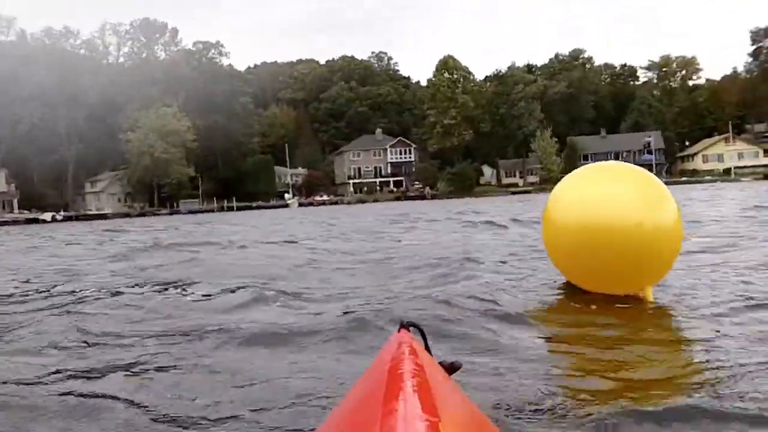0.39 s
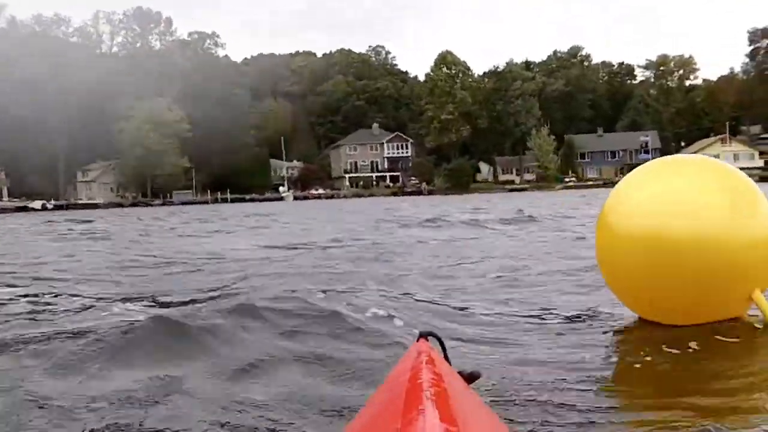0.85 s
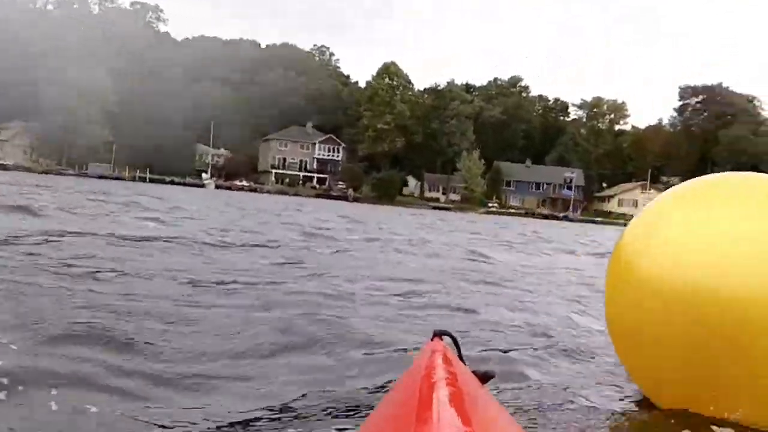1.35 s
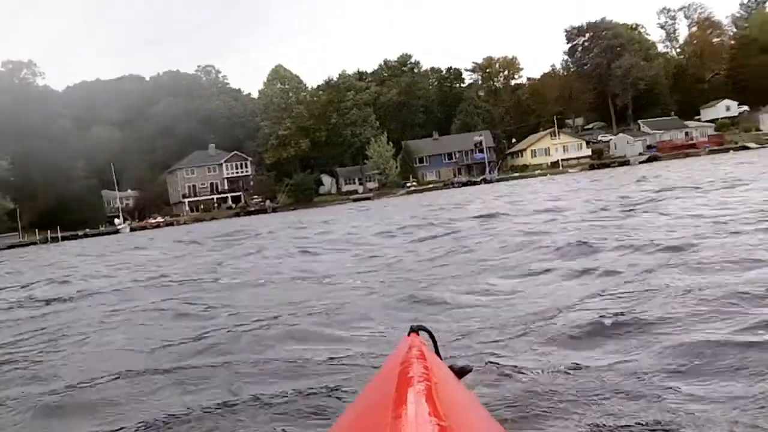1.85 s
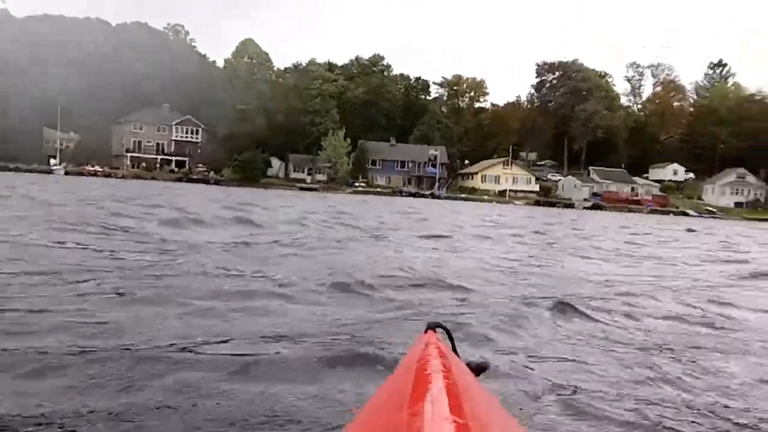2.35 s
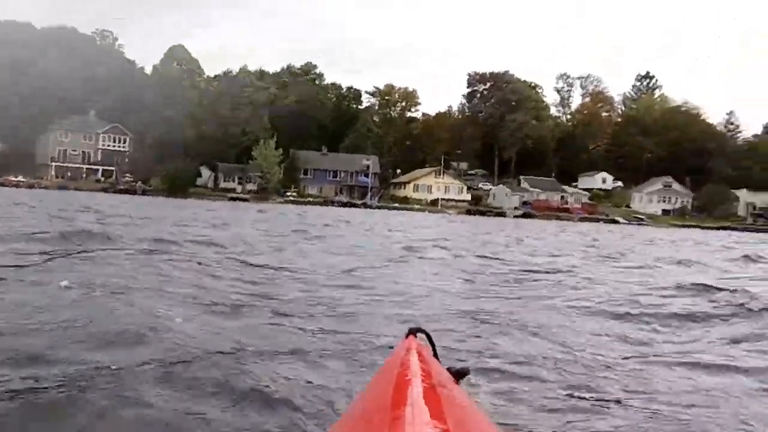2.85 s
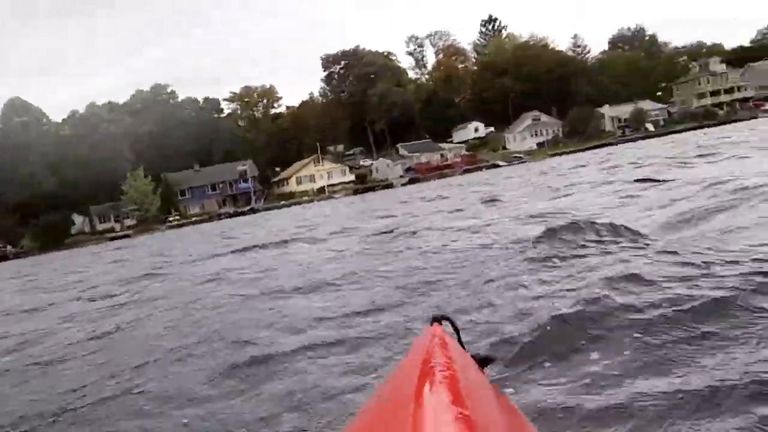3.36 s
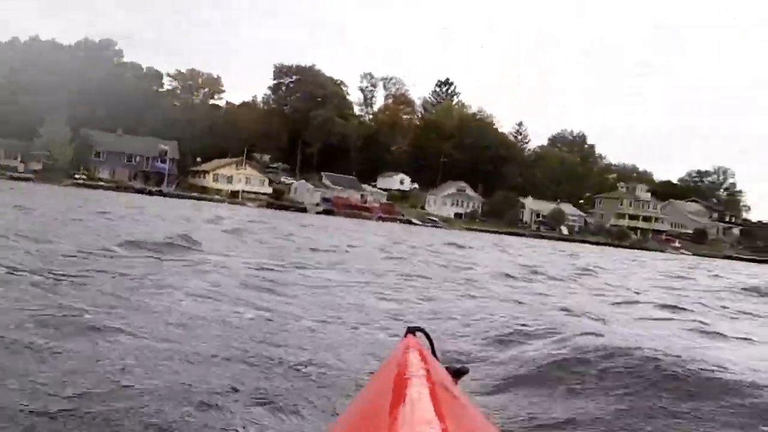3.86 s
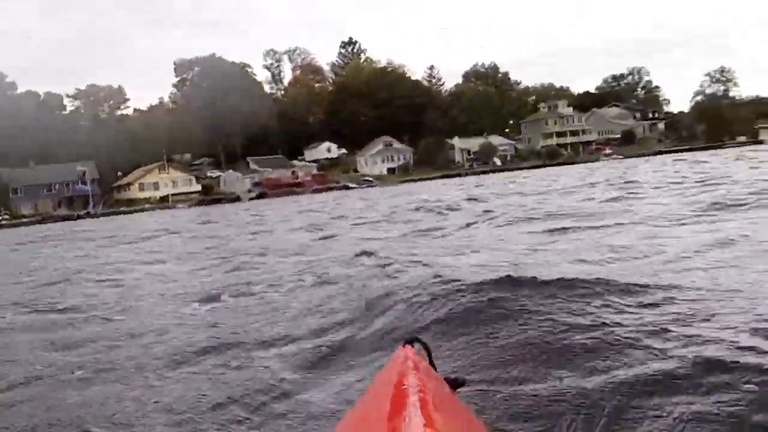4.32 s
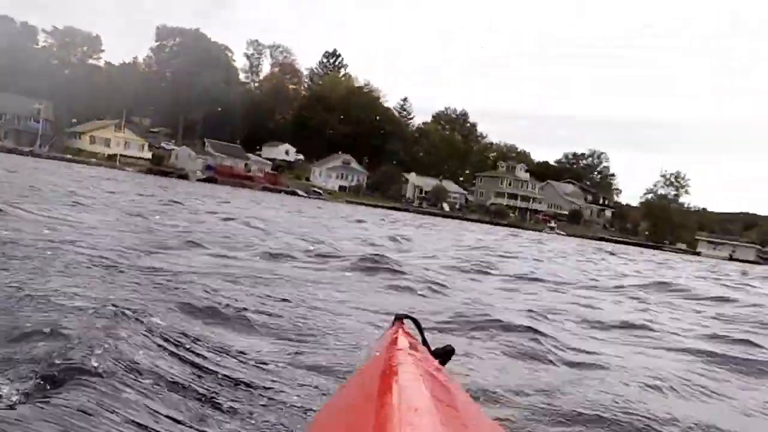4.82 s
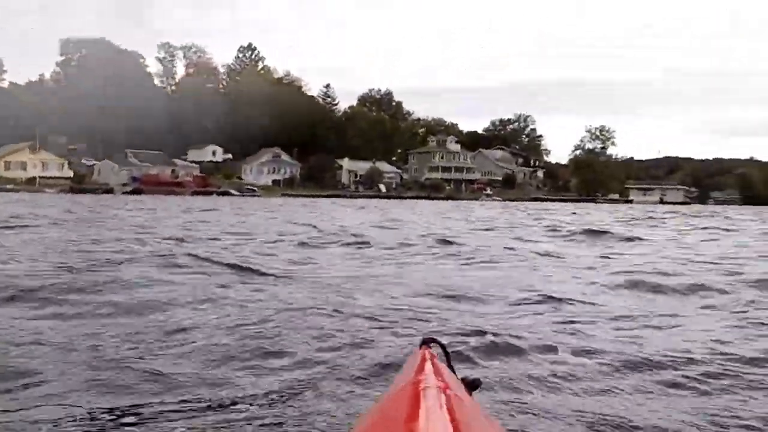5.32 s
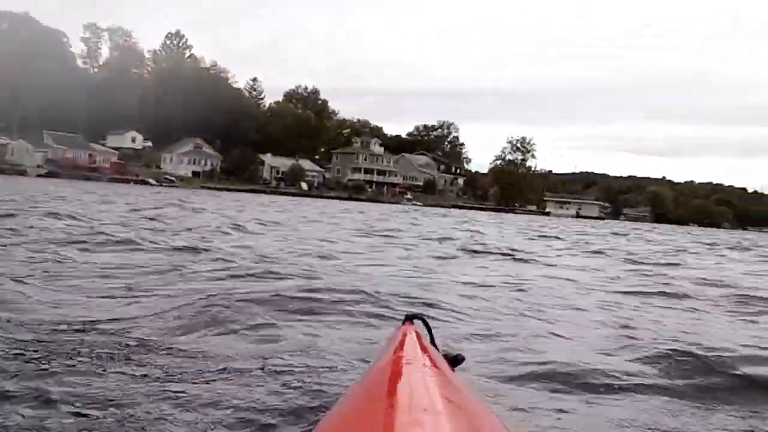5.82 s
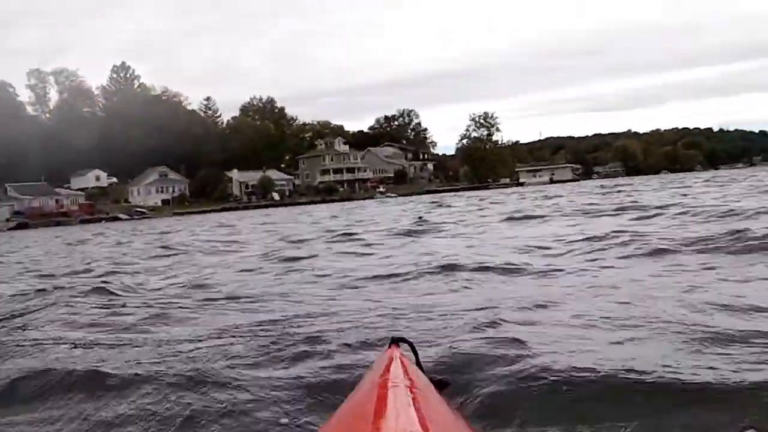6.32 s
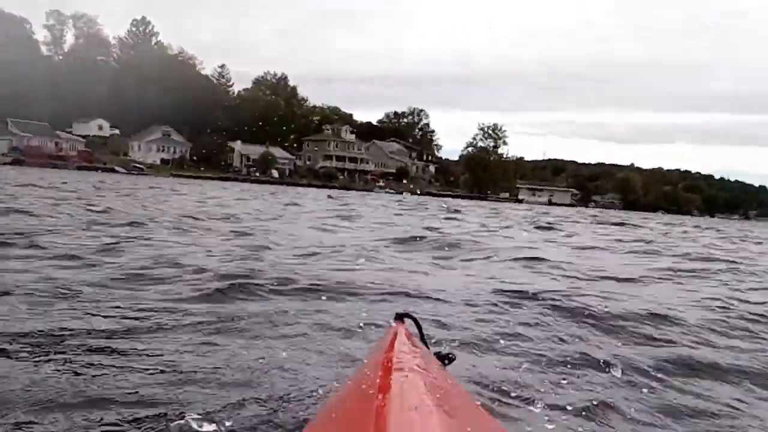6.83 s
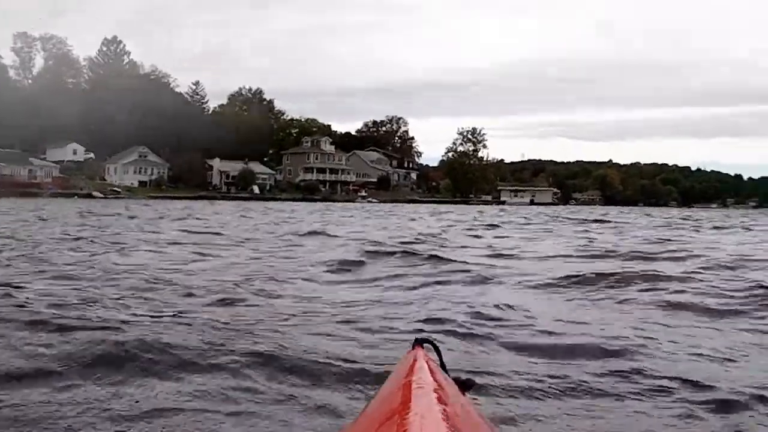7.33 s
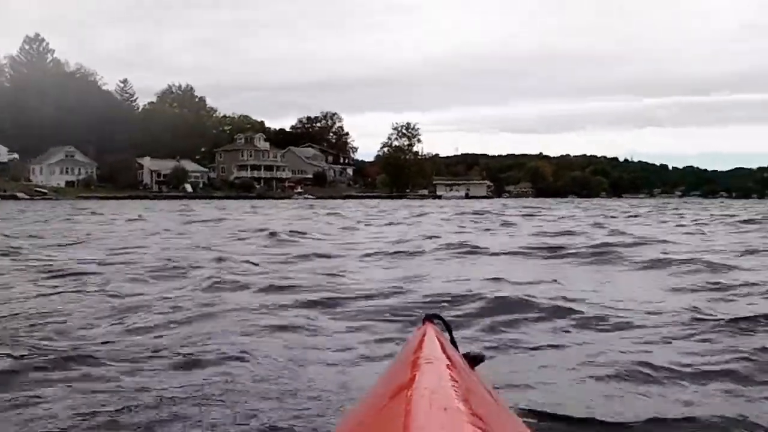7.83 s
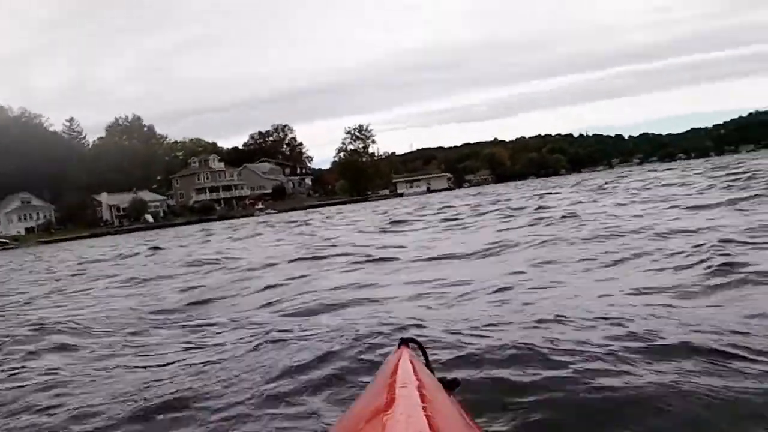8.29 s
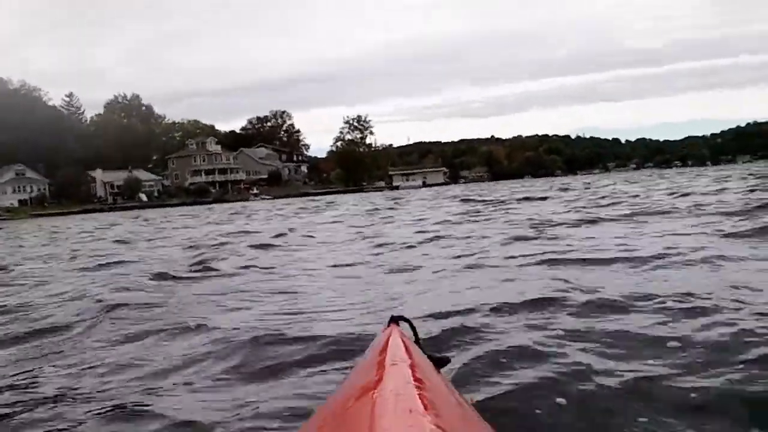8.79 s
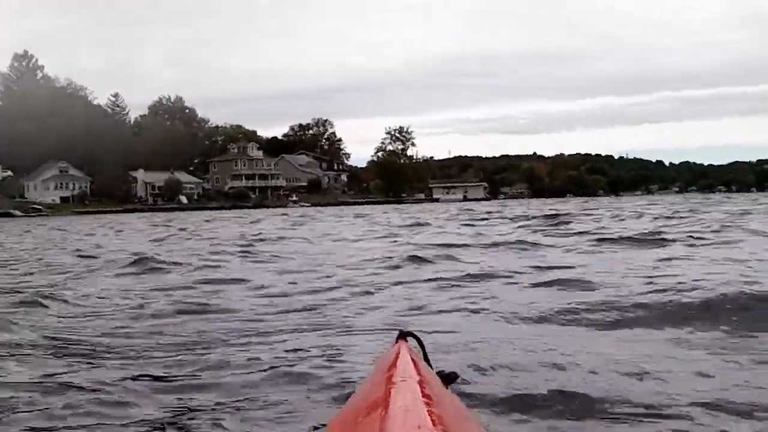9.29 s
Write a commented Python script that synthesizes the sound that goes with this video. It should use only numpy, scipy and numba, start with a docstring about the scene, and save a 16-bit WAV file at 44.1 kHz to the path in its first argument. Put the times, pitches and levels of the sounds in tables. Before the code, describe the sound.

From a kayak on a choppy lake, close and muffled inside a waterproof case: gusty low wind rushes and buffets, water gurgles along the hull, and wavelets knock the hollow plastic bow. A sharp knock comes near 2.5 seconds, the heaviest slap and thud at 4.3, another thud at 6.3. Spray and bubbles patter between; wind fades late, leaving faint hiss.

```python
"""Waves swash, thud and knock on the plastic bow of a kayak in choppy lake water: damped rings and shaped noise.
Spray and drops patter as swarms of short rings, bubbles ring singly, and sheets of water hiss along the bow.
Wind buffets and rushes over the waterproof case of a small camera: noise under wandering levels, and puffs.
The case dulls the treble, so the camera's own steady hiss fills it and ducks under the hardest slaps."""
import sys
import numpy as np
from scipy import signal
from scipy.fft import rfft, irfft, next_fast_len
from scipy.io import wavfile
from scipy.ndimage import uniform_filter1d
from numba import njit

SR = 44100
rng = np.random.default_rng(int(sys.argv[2]) if len(sys.argv) > 2 else 0)


def undo_db(level):
    """Turn decibels back into plain size, where 20 dB means ten times bigger."""
    steps = np.asarray(level, float) / 20
    return 10 ** steps


def unload_wav(signal):
    """Save mono or channel-first audio to the path in sys.argv[1] as 16-bit WAV at rate SR, clipped to [-1, 1]."""
    wavfile.write(
        sys.argv[1],
        SR,
        np.round(np.clip(np.atleast_2d(signal).T, -1, 1) * 32767).astype(np.int16),
    )


N = 426447

# course of the wind: (time [s], rush level [dB], buffeting level [dB], level of the rush's bright edge [dB])
WIND_COURSE = [(0.0, -38.5, -48, -60), (0.4, -37.5, -45, -56), (0.84, -42.5, -50, -58.5),
               (0.96, -42, -35, -64), (1.14, -39.5, -50, -55), (1.45, -39.5, -46.5, -56),
               (1.83, -37.5, -38, -53), (2.26, -34, -45.5, -50), (2.48, -42, -36, -58.5),
               (2.63, -34, -38.5, -49.5), (2.73, -43, -36.5, -60.5), (3.0, -33, -39.5, -40.5),
               (3.5, -39, -37, -52), (3.77, -32, -29, -48), (3.95, -37.5, -39.5, -44),
               (4.42, -37.5, -40, -51), (4.98, -41.5, -43, -58.5), (5.27, -38.5, -41, -49),
               (6.05, -41.5, -43, -59.5), (6.27, -37, -47, -53.5), (7.06, -48, -47, -59),
               (7.78, -41.5, -41.5, -56), (8.1, -46, -45.5, -58.5), (8.2, -54, -51, -66),
               (9.05, -56, -54, -66.5), (9.67, -49, -45, -54.5)]
# the rush rises in pitch as the boat turns in the wind: (time [s], centre frequency [Hz])
RUSH_PITCH = [(0, 426), (2.3, 513), (4.2, 537), (9.67, 636)]
# passage of spray sound through the cavity of the case: (frequency [Hz], relative gain [dB])
CAVITY_RESPONSE = [(900, -36), (1500, -2.5), (1900, -3), (2400, 2), (3000, 4), (3600, -2), (4300, -4),
                   (5500, -16), (8000, -22)]
GUST_DB = -40  # rush level at which swash and spray have their reference levels


def level(x, db):
    """Root-mean-square scaling: brings a signal to an rms level in dB."""
    return x * undo_db(db) / np.sqrt(np.mean(x ** 2))


def colour(x, points):
    """Linear filtering: multiplies the spectrum by (Hz, dB) points joined on a log-frequency axis."""
    hz, db = np.transpose(points)
    size = next_fast_len(N)
    f = np.arange(size // 2 + 1) * SR / size + 1
    gain = undo_db(np.interp(np.log(f), np.log(hz), db))
    return irfft(rfft(x, size) * gain, size)[:N]


def curves(table):
    """Linear interpolation: the columns of a timed table, one value a sample."""
    s, *columns = np.transpose(table)
    return [np.interp(np.arange(N) / SR, s, column) for column in columns]


def walk(rate):
    """Smoothed random process: levels held 1 / rate s and averaged twice, with a spread near 1."""
    k = int(SR / rate)
    held = np.repeat(rng.standard_normal(N // k + 1), k)
    return 1.37 * uniform_filter1d(uniform_filter1d(held, k), k)[:N]


def flicker(x, rate, depth_db):
    """Amplitude modulation: a random walk of the level in dB, then scaling to unit rms."""
    return level(x * undo_db(depth_db * walk(rate)), 0)


def swells(table):
    """Exponential growth and decay: gain of events that rise, hold and die away, summed in power."""
    fall_s = 0.086
    t = np.arange(0, N, 64) / SR
    s, rise_s, hold_s, db = np.transpose(table)[:, :, None]
    rising = (t - s) / rise_s
    falling = (s + hold_s - t) / fall_s
    shape = np.exp(np.minimum(0, np.minimum(rising, falling)))
    gain = np.sqrt(np.sum((undo_db(db) * shape) ** 2, axis=0))
    return np.interp(np.arange(N) / SR, t, gain)


@njit
def svf(x, hz, width):
    """Resonance: a state-variable band-pass with a moving centre, width in Hz."""
    y, band, low = np.empty(len(x)), 0., 0.
    for i in range(len(x)):
        g, k = np.tan(np.pi * hz[i] / SR), width / hz[i]
        v = (band + g * (x[i] - low)) / (1 + g * (g + k))
        band, low, y[i] = 2 * v - band, low + 2 * g * v, k * v
    return y


@njit
def ring(s, size, hz, cycles, glide, sharp, length):
    """Damped oscillation: swells (faster when sharp), peaks at s, dies within its cycles as the pitch glides."""
    out = np.zeros(length)
    rise = np.log(sharp + 1) / sharp
    top = (sharp / (sharp + 1)) ** 2 * np.exp(-2 * rise)
    for j in range(len(s)):
        tau, phase = cycles[j] / hz[j] * SR, 0.
        start = max(int(s[j] * SR - rise * tau), 0)
        for i in range(min(int(5 * tau), length - start)):
            u = i / tau
            phase += 2 * np.pi * hz[j] * (1 + glide * u) / SR
            envelope = (1 - np.exp(-sharp * u)) ** 2 * np.exp(-2 * u)
            out[start + i] += size[j] / top * envelope * np.sin(phase)
    return out


def burst(s, db, hz, cycles, glide, sharp, after_s, spread, rest_db, count, lead=.35):
    """Superposed modes: each main ring is broken up by weaker ones at scattered times and pitches around it."""
    u = rng.random((len(s), 3, count))
    times = s[:, None] + after_s * (u[:, 0] - lead)
    pitch = hz[:, None] * np.exp(spread * (2 * u[:, 1] - 1))
    size = undo_db(db[:, None] + rest_db * (0.5 + u[:, 2]))
    rest_cycles = 0.607 * np.repeat(cycles, count)
    rest = ring(times.ravel(), size.ravel(), pitch.ravel(), rest_cycles, glide, sharp, N)
    return ring(s, undo_db(db), hz, cycles, glide, sharp, N) + rest


def patter(lo_hz, hi_hz, cycles, scatter_db, glide, sharp, count):
    """Random impulses: rings spread evenly over time and log pitch, most small and a few larger."""
    u = rng.random((count, 4)).T
    size = undo_db(-scatter_db * np.log(1 - .98 * u[1]))
    hz = lo_hz * (hi_hz / lo_hz) ** u[2]
    return ring(u[0] * N / SR, size, hz, cycles * 4 ** (u[3] - .5), glide, sharp, N)


@njit
def follow(x, attack, release):
    """Peak detection: an envelope that closes a fraction of the gap each sample, upward by attack."""
    e, y = 0., np.empty(len(x))
    for i in range(len(x)):
        e += (abs(x[i]) - e) * (attack if abs(x[i]) > e else release)
        y[i] = e
    return y


def hiss():
    """Electronic noise: the camera's steady hiss, random and broad in spectrum."""
    # (frequency [Hz], relative gain [dB])
    hiss_spectrum = [(500, 0), (4000, 0), (9000, -4), (11500, -2), (15000, -3)]
    return level(colour(rng.standard_normal(N), hiss_spectrum), -62)


def wind():
    """Turbulence: eddies shove the case, and air rushes past the port in a broad band that moves with the gust."""
    # low-frequency buffeting: (frequency [Hz], relative gain [dB])
    buffet_spectrum = [(12, -1), (25, -1), (40, 3.5), (57, 11.5), (80, 1), (130, -3.5), (200, -70)]
    # bright edge of the rush: (frequency [Hz], relative gain [dB])
    edge_spectrum = [(600, -16), (850, 3.5), (1100, 2), (1400, -4.5), (1700, -15.5), (2200, -54)]
    rush_db, buffet_db, edge_db = curves(WIND_COURSE)
    hz = curves(RUSH_PITCH)[0] * (1 + 0.052 * walk(4.02))
    eddies = walk(14)

    rumble = colour(rng.standard_normal(N), buffet_spectrum)
    buffet = flicker(rumble * undo_db(0.85 * eddies), 7.3, 0.7)
    # single eddies dent the pressure for about a cycle or less
    shoves = level(patter(20.7, 140.0, 0.51, 2.9, glide=0.089, sharp=5.7, count=160), -0.92)

    band = svf(svf(rng.standard_normal(N), hz, 330.0), hz, 333.0)
    dull = signal.sosfilt(signal.butter(4, 760, fs=SR, output="sos"), band)
    rush = flicker(dull * undo_db(1.22 * eddies), 40, 2.8)

    bright = colour(rng.standard_normal(N), edge_spectrum)
    edge = flicker(bright * undo_db(1.36 * eddies), 30, 3.15)
    slurps = level(patter(850.0, 1330.0, 3.5, 3.6, glide=0.028, sharp=2.57, count=900), -7)
    return undo_db(buffet_db) * (buffet + shoves) + undo_db(rush_db) * rush + undo_db(edge_db) * (edge + slurps)


def puffs():
    """Resonant excitation: puffs of air sound the port for a few cycles at the pitch of the rush."""
    # (time [s], peak level [dB])
    puff_events = [(1.065, -30), (1.137, -24.5), (1.266, -26.5), (1.433, -24.5), (2.991, -35), (6.418, -34),
                   (6.54, -30)]
    s, db = np.transpose(puff_events)
    hz = np.interp(s, *np.transpose(RUSH_PITCH))
    return ring(s, undo_db(db), hz, np.full(len(s), 5.), 0., 1.7, N)


def swash(rush_db):
    """Flow noise: swash gurgles along the hull and ripples tap it, both following the wind."""
    # (frequency [Hz], relative gain [dB])
    flow_spectrum = [(60, -36), (100, -1), (190, -1.5), (280, -2), (420, 2), (700, -51)]
    swash_db = -43.5 + 0.74 * (rush_db - GUST_DB)  # slope in dB per dB of rush
    flow = flicker(colour(rng.standard_normal(N), flow_spectrum), 12, 0.89)
    gurgle = level(patter(100.6, 355.0, 1.074, 3.13, glide=0.16, sharp=1.64, count=500), 0.11)
    taps = level(patter(420.0, 714.0, 2.645, 0.64, glide=0.017, sharp=1.73, count=400), -8.5)
    return undo_db(swash_db) * (flow + gurgle) + undo_db(rush_db) * taps


def spray(rush_db):
    """Impact and bubble noise: spray breaks into clumped ticks, bubbles and mist, heard through the cavity."""
    # waves break at the bow and throw spray:
    # (time at full level [s], rise constant [s], hold [s], spray gain [dB])
    splash_events = [(0.05, 0.05, 0.3, -59.5), (2.493, 0.064, 0.023, -57), (2.81, 0.053, 0.25, -56.5),
                     (3.4, 0.16, 0.38, -61), (4.25, 0.0085, 0.015, -49), (4.727, 0.11, 0.16, -56),
                     (5.237, 0.21, 0.12, -53), (5.52, 0.064, 0.081, -50), (6.228, 0.017, 0.26, -60),
                     (6.97, 0.23, 0.13, -59.5), (7.315, 0.025, 0.36, -58.5), (7.548, 0.058, 0.44, -61.5),
                     (9.176, .01, 0.075, -56.5), (9.51, 0.12, 0.081, -50.5)]
    bubbles = patter(1713.0, 4550.0, 10, 2.6, glide=0.012, sharp=12.0, count=4500)
    ticks = patter(1300.0, 6100.0, 1.2, 5.5, glide=0., sharp=4.6, count=2000)
    mist = rng.standard_normal(N)
    mixture = (level(colour(bubbles, CAVITY_RESPONSE), -4)
               + level(colour(ticks, CAVITY_RESPONSE), -7)
               + level(colour(mist, CAVITY_RESPONSE), -6.5))
    clumped = undo_db(2.1 * walk(90)) * mixture
    # between splashes the spray follows the wind, in dB per dB of rush
    steady = undo_db(-63 + 0.24 * (rush_db - GUST_DB))
    return np.hypot(steady, swells(splash_events)) * clumped


def wash():
    """Flow noise: sheets of water slide along the bow, sounding below the spray."""
    # (time at full level [s], rise constant [s], hold [s], level [dB])
    wash_events = [(2.92, 0.11, 0.4, -56), (4.15, 0.025, 0.045, -55), (6.23, 0.012, 0.037, -56)]
    # (frequency [Hz], relative gain [dB])
    wash_spectrum = [(800, -24), (1300, 7), (1800, 1), (2400, 0), (4500, -26)]
    return swells(wash_events) * flicker(colour(rng.standard_normal(N), wash_spectrum), 50, 1.3)


def sprinkles():
    """Superposed impacts: fine spray on the case is a swarm of tiny bright ticks."""
    # (time [s], peak level of the main tick [dB])
    sprinkle_events = [(4.716, -53), (4.75, -51.5)]
    s, db = np.transpose(sprinkle_events)
    return burst(s, db, np.full(len(s), 6000.), np.full(len(s), 4.5), glide=0., sharp=3.2,
                 after_s=0.011, spread=0.97, rest_db=-1.8, count=40)


def lone_bubbles():
    """Bubble resonance: lone bubbles ring clean and briefly."""
    # (nominal time, just ahead of the peak [s], peak level [dB], frequency [Hz])
    gulp_events = [(0.383, -34, 1100), (0.692, -42.5, 2080), (0.715, -50, 3600), (1.204, -39.5, 1210),
                   (1.3219, -45.5, 3030), (2.5336, -39, 1060), (3.127, -42, 1740), (6.09, -47.5, 2440),
                   (6.231, -32, 1140), (6.2602, -31, 1230), (6.3175, -43, 3100), (6.3246, -40, 2350),
                   (6.43, -51, 2320), (8.357, -47.5, 1180)]
    s, db, hz = np.transpose(gulp_events)
    decay_s = 0.0048
    return ring(s + 0.00259, undo_db(db), hz, decay_s * hz, 0.0068, 2.2, N)


def drops():
    """Impact and bubble resonance: a drop gives a broad tick, then the bubbles it drags under ring."""
    # the clearest drops falling back: (time [s], nominal peak level [dB], bubble frequency [Hz])
    drop_events = [(0.382, -40.5, 3330), (0.442, -44.5, 3100), (1.0584, -44, 2320), (1.23, -41, 2960),
                   (1.51, -42.5, 2900), (1.8997, -41.5, 3120), (2.0263, -44, 3560), (2.2655, -33.5, 2440),
                   (2.3087, -46, 3100), (2.4995, -34.5, 3060), (2.5301, -43, 3000), (2.549, -43, 1980),
                   (2.807, -38.5, 2520), (2.8547, -39, 2670), (2.9677, -41, 3100), (3.1582, -37, 2240),
                   (3.1842, -38, 3000), (3.4486, -43, 2800), (4.2424, -41, 3040), (4.2534, -32, 2800),
                   (4.3134, -38, 3050), (4.348, -34.5, 2940), (4.4113, -43, 3100), (4.5476, -44, 3220),
                   (4.6553, -43, 3400), (4.69, -42, 2550), (4.851, -41, 2900), (5.243, -31, 2970),
                   (5.2662, -37, 2350), (5.46, -42, 3020), (5.5837, -36.5, 2970), (6.225, -42, 2620),
                   (6.2374, -37, 2100), (6.261, -37.5, 3020), (6.2835, -41, 2480), (6.3455, -38, 3100),
                   (6.3473, -36, 2140), (6.369, -36.5, 2100), (6.3705, -41, 3100), (6.377, -43, 3580),
                   (6.485, -47, 3300), (6.9716, -46, 2670), (7.072, -41, 3100), (7.311, -40.5, 3220),
                   (7.3898, -38, 2860), (7.6, -43, 2400), (9.1664, -44.5, 4040), (9.1828, -41, 2870),
                   (9.195, -45, 2100), (9.5382, -41, 2810)]
    s, db, hz = np.transpose(drop_events)
    ticks = burst(s, db - 1, np.full(len(s), 3100.), np.full(len(s), 1.2), glide=0., sharp=6.8,
                  after_s=0.008, spread=0.35, rest_db=-4, count=3, lead=0)
    bubbles = burst(s, db - 0.6, hz, np.full(len(s), 10.5), glide=0.022, sharp=11.0,
                    after_s=.012, spread=0.29, rest_db=-10.0, count=4, lead=0)
    high_pass = signal.butter(3, 1700, "high", fs=SR, output="sos")
    return signal.sosfilt(high_pass, colour(ticks, CAVITY_RESPONSE) + bubbles)


def knocks():
    """Shell resonance: wavelets knock the deck; water spreads over the shell, so knocks swell for a few cycles."""
    # (time [s], peak level of the main ring [dB], decay [cycles])
    knock_events = [(2.414, -29, 3.1), (2.55, -16.5, 3.67), (2.598, -34, 2), (2.856, -28, 2.9),
                    (3.167, -18.5, 1.9), (3.776, -25, 4.8), (4.26, -10.5, 3.54), (4.341, -21, 6.3),
                    (4.352, -19.5, 6.47), (4.445, -16, 2.8), (4.936, -19, 4.4), (5.247, -28.5, 2.96),
                    (5.282, -28, 6.7), (6.189, -30, 2.8), (6.225, -25, 7.4), (6.236, -20, 2.45),
                    (6.266, -27, 2.6), (6.49, -29, 6.8), (6.557, -29, 8.4), (6.696, -28, 4.8),
                    (6.746, -28, 6.9), (7.325, -24.5, 8.2), (7.345, -18, 2.8), (7.412, -31, 2.9),
                    (7.799, -27, 2.46), (8.768, -41, 6.2), (9.25, -29, 5.2), (9.537, -33, 5.2)]
    s, db, cycles = np.transpose(knock_events)
    deck_hz = np.full(len(s), 633.5)
    body = burst(s, db, deck_hz, cycles, glide=-0.02, sharp=1.7,
                 after_s=0.012, spread=0.25, rest_db=-6.5, count=3, lead=.25)
    crack = burst(s, db - 25, 2.06 * deck_hz, np.full(len(s), 2.2), glide=0., sharp=1.1,
                  after_s=0.004, spread=0.086, rest_db=0, count=1)
    return body + crack


def thuds():
    """Air-pocket resonance: waves close on air under the bow, and the pocket breaks into froth of many sizes."""
    # (time [s], peak level of the main ring [dB], pocket frequency [Hz], decay [cycles])
    thud_events = [(2.414, -23.5, 210, 1.33), (3.205, -20, 340, 5.4), (4.262, -14, 192, 2.13),
                   (4.2807, -11, 216, 1.2), (4.299, -22, 118, 1.5), (4.313, -18, 295, 2.5),
                   (4.346, -19, 258, 2.95), (4.445, -23.5, 337, 3.88), (4.6, -21.5, 298, 1.9),
                   (4.941, -27.5, 346, 4.3), (6.212, -19.5, 203, 1.2), (6.287, -10, 196, 1.33),
                   (7.751, -26.5, 193, 3.9), (7.775, -25.5, 309, 5.05), (8.467, -36, 400, 1.7)]
    s, db, hz, cycles = np.transpose(thud_events)
    pocket = burst(s, db, hz, cycles, glide=0., sharp=1.5,
                   after_s=0.02, spread=0.5, rest_db=-9.0, count=2)
    froth = burst(s, db - 13.5, 1.6 * hz, np.full(len(s), 1.8), glide=0.063, sharp=0.99,
                  after_s=.05, spread=0.6, rest_db=-1.0, count=7)
    return pocket + froth


def scene():
    """Superposition: the pressures of all sources add at the microphone."""
    rush_db = curves(WIND_COURSE)[0]
    air = wind() + puffs()
    water = swash(rush_db) + spray(rush_db) + wash() + sprinkles() + lone_bubbles() + drops()
    return (air + water + knocks() + thuds())[None]


def band_limit(x):
    """A steep low-pass at the top of the band."""
    return signal.sosfilt(signal.butter(12, 15570, fs=SR, output="sos"), x)


def record(dry):
    """Filtering and compression: hiss joins, narrow bands are cut, gain ducks under slaps, the top is cut."""
    # (centre frequency [Hz], width [Hz], gain at the centre [dB])
    notches = [(7850, 1100, -11), (7890, 170, -24), (11850, 130, -22)]
    f = np.arange(N // 2 + 1) * SR / N
    notch_db = sum(db * np.exp(-(2 * (f - hz) / width) ** 2) for hz, width, db in notches)
    notched = irfft(rfft(dry[0] + hiss()) * undo_db(notch_db), N)
    loudness = follow(notched, 0.0065, 0.00046)
    # above -21 dB the gain falls by 0.7 dB per dB
    ducked = notched * np.minimum(1, undo_db(-21) / (loudness + 1e-9)) ** .7
    low_pass = signal.ellip(12, .2, 70, 15000, fs=SR, output="sos")
    mix = signal.sosfilt(low_pass, ducked)[None]
    return band_limit(mix)


dry = scene()
out = record(dry)
unload_wav(out)
```